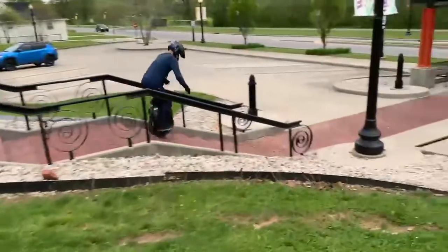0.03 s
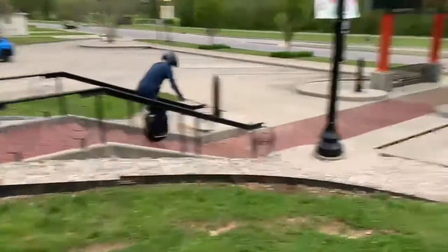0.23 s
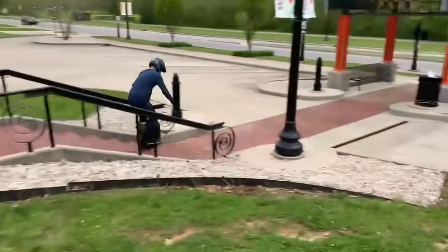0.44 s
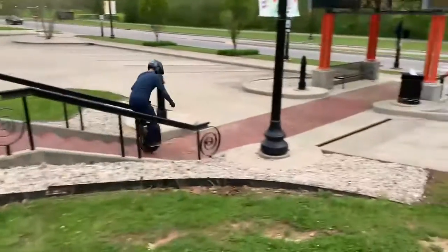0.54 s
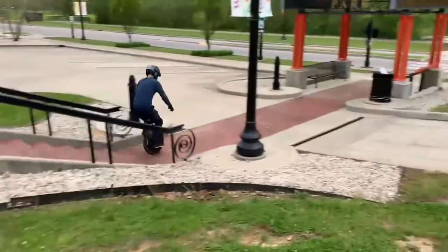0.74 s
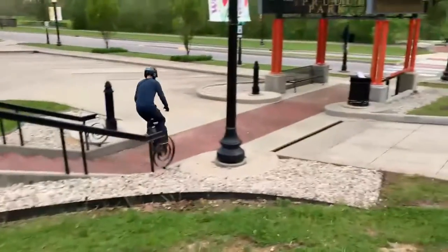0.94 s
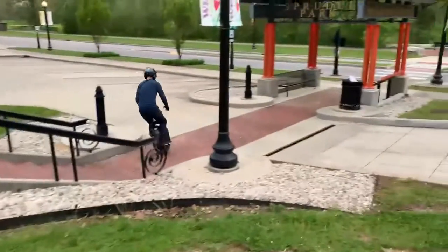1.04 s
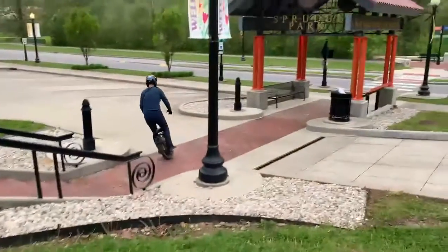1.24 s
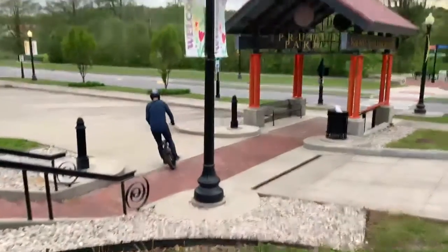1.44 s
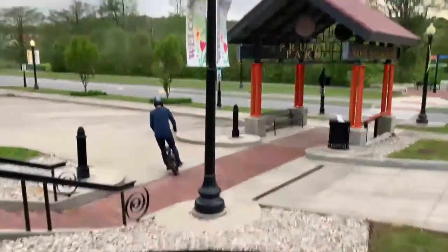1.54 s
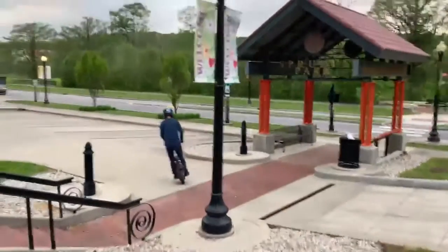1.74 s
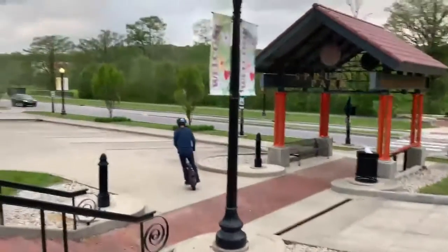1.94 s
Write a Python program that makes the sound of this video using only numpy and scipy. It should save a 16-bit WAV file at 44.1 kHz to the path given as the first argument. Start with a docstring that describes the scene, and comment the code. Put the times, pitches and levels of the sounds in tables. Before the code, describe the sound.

An electric unicycle bumps down five stone steps from about 0.2 to 0.7 seconds, each landing a tyre thump with a hollow knock, pedal clatter and short echo, loose parts rattling between. A softer bounce follows at 0.8 seconds. The wheel then rolls away with faint gritty ticks and two scuffs near 1.5 and 1.8 seconds. Light wind and road hiss continue, and a car approaches towards the end.

```python
"""Stone steps on a plaza, a road nearby, light wind; heard through a pair of small microphone ports.
An electric unicycle bumps down five steps, bounces once and rolls off into the distance.
At each step the tyre thumps and rings, the hollow shell knocks and the pedals clatter; loose parts
rattle in between, and low walls slap the sound back. Further off the tyre ticks over grit and
scuffs twice, while a car nears on the road to the left."""
import sys
import numpy as np
from scipy import signal
from scipy.fft import rfft, irfft, next_fast_len
from scipy.io import wavfile

SR = 44100
rng = np.random.default_rng(int(sys.argv[2]) if len(sys.argv) > 2 else 0)


def put_to_file(sound):
    """Save the sound as 16-bit audio at rate SR, in the file named by the first command-line argument."""
    columns = np.atleast_2d(sound).T  # one column per channel
    safe = np.clip(columns, -1, 1)
    whole_steps = np.round(safe * 32767)
    wavfile.write(sys.argv[1], SR, whole_steps.astype(np.int16))


N = 88200

# the wheel lands: t/s, tyre thump/dB, tyre pitch/Hz, low thud/dB, shell knock/dB, clatter/dB
LANDINGS = [(0.1952, -9, 267, -22, -21, -22.5), (.318, -11, 254, -28, -21.5, -27),
            (0.426, -10, 255, -42, -23.5, -24.5), (0.5427, -7.5, 274, -19.5, -19, -25),
            (0.6458, -8.5, 288, -15.5, -18.5, -22), (0.8166, -21.5, 285, -28.5, -37, -41)]
# loose parts rattle as the wheel jolts: t/s, knock/dB, click/dB, tyre bump/dB
RATTLES = [(.020, -30.5, -44.5, -51), (0.047, -35.5, -41, -42), (0.053, -49, -54, -33),
           (0.09, -35.5, -36, -40), (0.236, -43, -61, -29), (.292, -28.5, -29.5, -29),
           (0.354, -38, -43, -32.5), (.400, -37.5, -37, -46), (0.466, -56, -38, -21.5),
           (0.516, -31, -32.5, -31), (0.621, -33, -35, -43), (0.681, -35, -42, -35.5),
           (0.689, -29, -32.5, -35.5), (0.731, -28.5, -30, -26.5), (0.759, -60, -46, -44)]


def amp(db):
    """Decibels to gain."""
    return 10 ** (np.asarray(db) / 20)


def unit(x):
    """Scales to rms 1."""
    return x / np.sqrt(np.mean(x ** 2) + 1e-20)


def read(points, hz):
    """Reads a table along log frequency."""
    f, value = np.transpose(points)
    return np.interp(np.log(hz + 1), np.log(np.sort(f) + 1), value)


def clock():
    """Time of every sample."""
    return np.arange(N) / SR


def level(points):
    """Gain over time from rows of t/s, level/dB."""
    return amp(np.interp(clock(), *np.transpose(points)))


def colour(x, points):
    """Minimum-phase filter from rows of f/Hz, level/dB; white noise keeps its power."""
    size = 4096
    gain = unit(amp(read(points, abs(np.fft.fftfreq(size, 1 / SR)))))
    response = np.exp(np.conj(signal.hilbert(np.log(gain + 1e-6))))
    taps = np.fft.ifft(response).real[:size // 2]
    return signal.oaconvolve(x, taps[None], axes=1)[:, :N]


def pair(likeness):
    """Partly alike white noises, left and right."""
    a, b = rng.standard_normal((2, N))
    return np.array([a, likeness * a + np.sqrt(1 - likeness ** 2) * b])


def flutter(depth_db, rate_hz):
    """A gain that wanders smoothly at random, by depth_db rms."""
    hz = np.fft.rfftfreq(N, 1 / SR)
    drift = irfft(rfft(rng.standard_normal(N)) * np.exp(-(hz / rate_hz) ** 2), N)
    return amp(depth_db * unit(drift))


def lag_right(x, seconds):
    """Sound from the left reaches the right port later."""
    turn = np.exp(-2j * np.pi * np.fft.rfftfreq(N, 1 / SR) * seconds)
    return np.array([x[0], irfft(rfft(x[1]) * turn, N)])


def burst(start, attack, hold, t60):
    """Envelope: attack, hold, then a steady fall; times in seconds."""
    t = clock() - start
    return np.clip(t / attack, 0, 1) * amp(-60 * np.maximum(t - attack - hold, 0) / t60)


def push(t, hz, rise_s, fall_s, sag_per_s):
    """A few cycles that swell and die around t = 0 while their pitch sags."""
    t = np.clip(t, -4 * rise_s, 4 * fall_s)
    turns = hz * (1 - np.exp(-sag_per_s * t)) / sag_per_s
    return np.exp(-(t / np.where(t < 0, rise_s, fall_s)) ** 2) * np.cos(2 * np.pi * turns)


def tones(t, modes):
    """Dying sines from t = 0 on, from rows of f/Hz, level/dB, t60/s."""
    t = np.maximum(t, 0)
    return sum(amp(db - 60 * t / t60) * np.sin(2 * np.pi * hz * t) for hz, db, t60 in modes)


def ringing(x, modes):
    """Drives a table of modes with x; white noise keeps its power."""
    ring = tones(clock()[:SR // 4], modes)
    return signal.oaconvolve(x, ring[None] / np.linalg.norm(ring), axes=1)[:, :N]


def rolling():
    """The tread rumbles unevenly over the stone and fades with distance."""
    # rumble down the steps and away: t/s, level/dB
    passage = [(0, -41.5), (.06, -40.5), (.18, -38.5), (.4, -37), (.6, -36.5), (.72, -34), (.8, -42.5),
               (.88, -48), (.98, -55), (2, -59)]
    # tread on stone: f/Hz, level/dB
    spectrum = [(30, -19), (70, 3.5), (150, -2.5), (280, -2), (420, -12.5), (700, -12), (1300, -17),
                (2500, -21.5), (5000, -27.5), (10000, -29.5), (16000, -39.5)]
    return level(passage) * unit(colour(pair(0.97) * flutter(depth_db=1.93, rate_hz=84), spectrum))


def road():
    """Steady hiss from the nearby road, off to the left."""
    # traffic at the microphone: t/s, level/dB
    traffic = [(0, -47.5), (.9, -46.5), (1.2, -47.5), (1.5, -47.5), (2, -45.5)]
    # road hiss: f/Hz, level/dB
    spectrum = [(60, -25), (250, 4.5), (450, 1.5), (700, 7), (950, -1.5), (1300, 0), (2400, 0),
                (3700, -7.5), (5000, -20), (7000, -20.5), (10000, -66), (16000, -56)]
    # how alike the two ports hear it: f/Hz, likeness/0..1
    coherence = [(60, .95), (300, 0.55), (700, 0.39), (1500, 0.08), (2500, 0.14), (5000, 0.55), (8000, .7),
                 (12000, 0.45)]
    a, b = rfft(rng.standard_normal((2, N)))
    likeness = read(coherence, np.fft.rfftfreq(N, 1 / SR))
    hiss = irfft(np.array([a, likeness * a + np.sqrt(1 - likeness ** 2) * b]), N)
    hiss = lag_right(hiss, seconds=0.00006)
    return level(traffic) * unit(colour(hiss * flutter(depth_db=0.61, rate_hz=54), spectrum))


def wind():
    """Light wind on the ports makes a low, lumpy rumble."""
    # breeze: t/s, level/dB
    gusts = [(0, -44.5), (.8, -45.5), (1.2, -46), (1.5, -46.5), (1.72, -45), (1.79, -42.5), (2, -48)]
    # wind on the ports: f/Hz, level/dB
    spectrum = [(20, -36.5), (40, -4.5), (60, 0.5), (100, 0.5), (160, -6), (280, -9.5), (450, -15.5),
                (2000, -57.5), (16000, -71)]
    return level(gusts) * unit(colour(pair(0.88) * flutter(depth_db=2.9, rate_hz=27), spectrum))


def thump(start, db, hz):
    """The tyre is squashed, springs back and rings briefly."""
    # air and rubber of the tyre: f/Hz, level/dB re thump, t60/s
    modes = [(192, -29, 0.15), (245, -21.5, 0.4), (298.2, -19, 0.066)]
    t = clock() - start - 0.00855  # zero when the tyre is flattest, just after contact
    return amp(db) * (push(t, hz, rise_s=0.0043, fall_s=0.0041, sag_per_s=30.5) + tones(t, modes))


def tyre():
    """A thump at each landing, a lower thud as the weight arrives, and small bumps between."""
    out = np.zeros(N)
    for start, thump_db, hz, thud_db, _, _ in LANDINGS:
        out += thump(start, thump_db, hz)
        thud = push(clock() - start - 0.01702, hz=140, rise_s=0.0061, fall_s=0.01, sag_per_s=28)
        out -= amp(thud_db) * thud
    for start, _, _, bump_db in RATTLES:
        out += thump(start, bump_db, hz=268)
    return np.array([out, out])


def shell_and_pedals():
    """Rim blows and bursts of tiny collisions ring the hollow shell; brighter bursts ring the metal."""
    # grit ticks under the tyre on the plaza: t/s, knock/dB, click/dB
    grit = [(1.021, -72, -51), (1.106, -45, -78), (1.206, -65, -58.5), (1.321, -74, -54.5)]
    # dull knock and bright clatter: f/Hz, level/dB
    knock_spectrum = [(100, -23.5), (300, -6.5), (410, -8.5), (500, 13), (610, -4.5), (750, 10), (940, 2.5),
                      (1100, 1.5), (1400, 0.5), (1680, -15), (2000, -8.5), (2260, -18), (2500, -6),
                      (6000, -20.5), (16000, -59)]
    clatter_spectrum = [(200, -2.5), (1200, -2.5), (1680, 0.5), (2400, 1.5), (3200, 2), (4400, 3),
                        (5600, -1.5), (7500, 2), (8700, -2), (10500, -0.5), (12300, -3.5), (13800, -10.5),
                        (15500, -12.5)]
    # shell and frame, then pedals and brackets: f/Hz, level/dB, t60/s
    shell_modes = [(495.6, 1, 0.09), (696, 1.5, 0.08), (785, 4, 0.029), (1104, 3, 0.031), (1337, 7, 0.017),
                   (1898, -15, 0.042), (2024, -7, 0.047), (2576, -11.5, 0.03)]
    metal_modes = [(3700, -3, 0.072), (4100, -0.5, 0.071), (4320, -6.5, 0.053), (4784, -1, 0.021),
                   (5220, -1, 0.038), (6450, -6, 0.069), (6650, -5, 0.063), (7230, -6, 0.068),
                   (10200, -8.5, .03), (11300, 0.5, 0.037)]
    knock, clatter, blows = np.zeros((3, N))
    for start, _, _, _, knock_db, clatter_db in LANDINGS:
        blows[round((start + 0.0065) * SR)] = amp(knock_db + 19.5)  # the rim strikes the shell
        knock += amp(knock_db) * burst(start + 0.002, attack=0.003, hold=0.005, t60=0.07)
        clatter += amp(clatter_db) * burst(start, attack=0.002, hold=0.005, t60=0.05)
    for start, knock_db, click_db, *_ in RATTLES + grit:
        knock += amp(knock_db) * burst(start + 0.0005, attack=0.001, hold=0.002, t60=0.05)
        for delay_s, db in (0, 0), (0.0058, -11):  # a strike and its rebound
            clatter += amp(click_db + db) * burst(start + delay_s, attack=0.0006, hold=0.001, t60=0.028)
    grains = unit(flutter(depth_db=2, rate_hz=1200))
    knock = knock * grains * pair(0.86)
    clatter = clatter * grains * pair(0.86)
    hollow = amp(-3) * colour(knock, knock_spectrum) + ringing(blows + amp(-4) * knock, shell_modes)
    metal = amp(-0.5) * colour(clatter, clatter_spectrum) + amp(-11) * ringing(clatter, metal_modes)
    return hollow + metal


def plaza_echo(x):
    """Two dull slaps off low walls and a thin tail scattered by the steps and plaza."""
    # wall slaps: delay/s, level/dB
    walls = [(0.017, -23), (0.036, -18)]
    # scattered tail: f/Hz, level/dB
    spectrum = [(100, -16.5), (280, -19.5), (600, -6), (2000, -8.5), (6000, -10), (14000, -32.5)]
    bass_t60_s, twice_as_fast_hz = 0.27, 22000
    build_up = np.clip(clock()[:SR // 2] / 0.019, 0, 1) ** 2
    hz, t, scatter = signal.stft(pair(0.39)[:, :SR // 2] * build_up, SR, nperseg=256)
    decay = amp(-60 * t / bass_t60_s * (1 + hz / twice_as_fast_hz)[:, None])
    energy = (decay ** 2).sum(1, keepdims=True) * t[1] * SR
    decay *= amp(read(spectrum, hz))[:, None] / np.sqrt(energy)
    tail = signal.istft(scatter * decay, SR, nperseg=256)[1]
    slaps = sum(amp(db) * np.pad(x, ((0, 0), (round(s * SR), 0)))[:, :N] for s, db in walls)
    dull = signal.butter(1, 5000, fs=SR)  # rough stone scatters the treble
    return signal.fftconvolve(x, tail, axes=1)[:, :N] + signal.lfilter(*dull, slaps)


def pings():
    """Single parts ring on after a jolt, each with one dying tone."""
    # jolted parts: t/s, f/Hz, level/dB, t60/s
    parts = [(0.358, 4380, -33.5, 0.059), (.357, 5050, -34, .05), (.547, 3800, -22, .035),
             (.684, 1993, -32.5, 0.11), (.733, 762, -24, 0.032)]
    out = sum(tones(clock() - start, [mode]) for start, *mode in parts)
    return np.array([out, out])


def car():
    """A car nears from the left: a distant rush first, then the hiss of its tyres."""
    # the approach: t/s, level/dB
    rush_level = [(0, -60), (1, -56.5), (1.45, -53.5), (1.7, -51), (1.88, -48), (2, -43)]
    hiss_level = [(0, -80), (1.6, -72), (2, -57.5)]
    # rush and tyre hiss: f/Hz, level/dB
    rush_spectrum = [(100, -20), (400, -4), (750, 2), (1000, 3), (1400, 3.5), (2400, -10.5), (3600, -14.5),
                     (5500, -21), (8000, -43), (16000, -51)]
    hiss_spectrum = [(1000, -25), (2500, -1), (3300, -2), (4500, 0), (6000, -12), (9000, -35)]
    lag_s = 0.00011
    rush = colour(lag_right(pair(0.61), lag_s), rush_spectrum) * flutter(depth_db=0.84, rate_hz=25)
    hiss = colour(lag_right(pair(0.5), lag_s), hiss_spectrum)
    return level(rush_level) * unit(rush) + level(hiss_level) * unit(hiss)


def scuffs():
    """Rubber drags briefly over gritty stone as the wheel turns."""
    # drags: t/s, level/dB
    drags = [(1.539, -46), (1.82, -51.5)]
    # rubber on grit: f/Hz, level/dB
    spectrum = [(300, -17), (800, 5), (1400, 1), (2100, -1), (3200, -17), (8000, -39)]
    envelope = sum(amp(db) * burst(start, attack=0.006, hold=0.025, t60=0.12) for start, db in drags)
    return envelope * unit(colour(pair(0.7) * flutter(depth_db=4.6, rate_hz=250), spectrum))


def scene():
    """The wheel, its echo and the open air, from where the microphone stands."""
    wheel = tyre() + shell_and_pedals() + pings()
    return wheel + plaza_echo(wheel) + rolling() + road() + wind() + car() + scuffs()


def record(dry):
    """The microphone: two small ports that differ in phase and level, a low cut and a band limit."""
    # phase between the ports: f/Hz, left lead/rad
    port_phase = [(0, 0), (350, 0), (900, 1.2), (1400, 1), (2000, 7.3), (3000, 9.1), (4800, 11.4),
                  (5400, 10.3), (6500, 12.4), (8400, 9.4), (9400, 8.9), (10300, 6.3), (11600, 6.2),
                  (12900, 3.2), (13900, 3), (15000, 0)]
    # balance of the ports: f/Hz, left minus right/dB
    port_balance = [(60, 0), (99, 1.5), (160, 1.5), (270, 2.5), (450, -1.5), (740, -2), (1220, 0.5),
                    (2010, -1), (3330, -1.5), (5500, -5.5), (9080, 1), (15000, -0.5)]
    low_cut_hz, top_hz = 46, 16000
    size = next_fast_len(N + SR // 4)
    hz = np.fft.rfftfreq(size, 1 / SR)
    lean = amp(read(port_balance, hz) / 2)
    ports = np.array([lean, np.exp(-1j * read(port_phase, hz)) / lean])
    heard = irfft(rfft(dry, size) * ports, size)[:, :N]
    heard = signal.sosfilt(signal.butter(2, low_cut_hz, "high", fs=SR, output="sos"), heard)
    band_limit = signal.firwin(511, top_hz, window=("kaiser", 9), fs=SR)
    return signal.oaconvolve(heard, band_limit[None], "same")


dry = scene()
out = record(dry)
put_to_file(out)
```